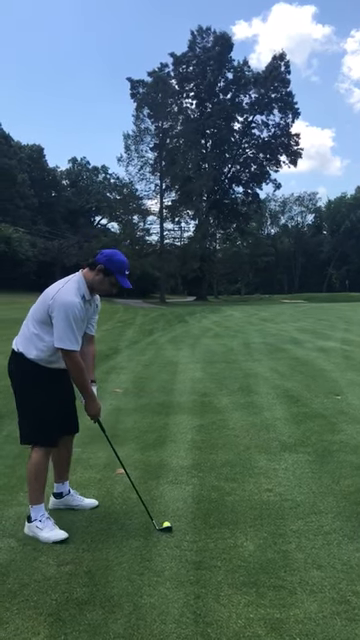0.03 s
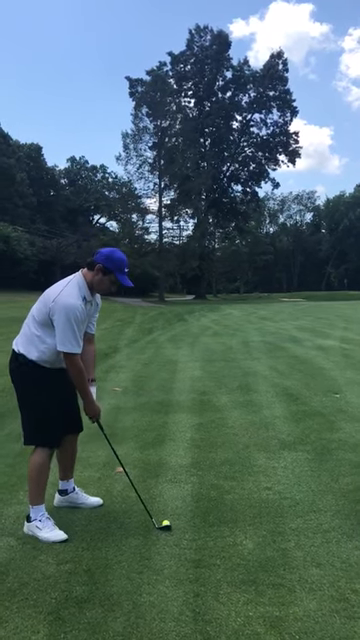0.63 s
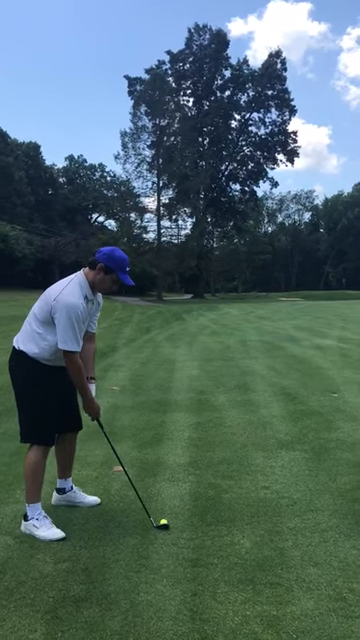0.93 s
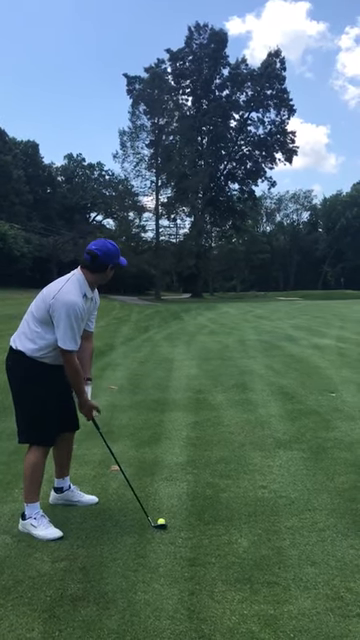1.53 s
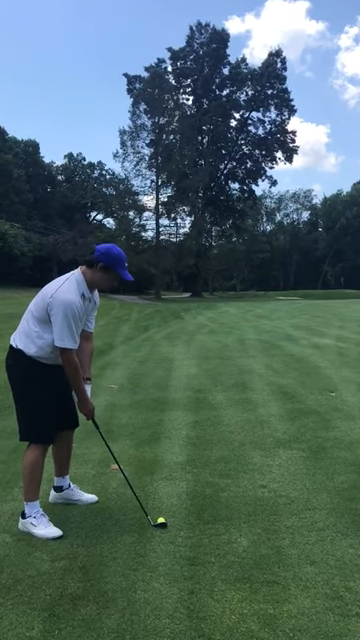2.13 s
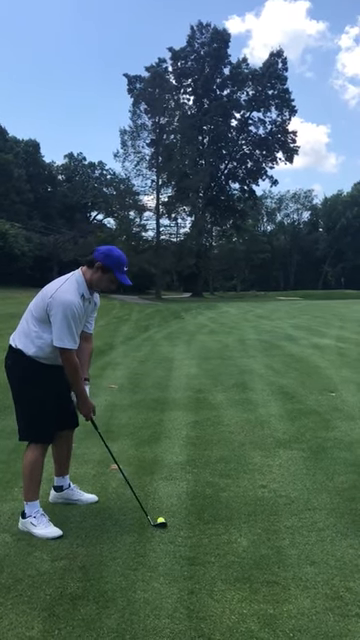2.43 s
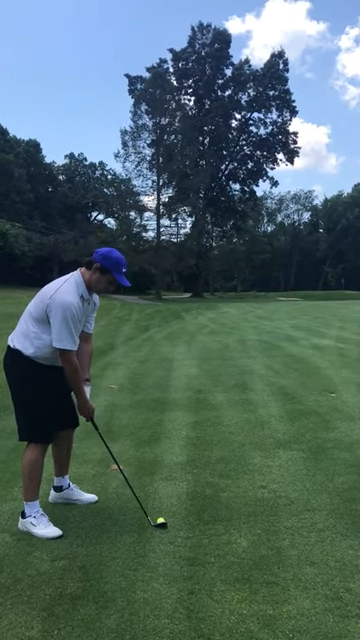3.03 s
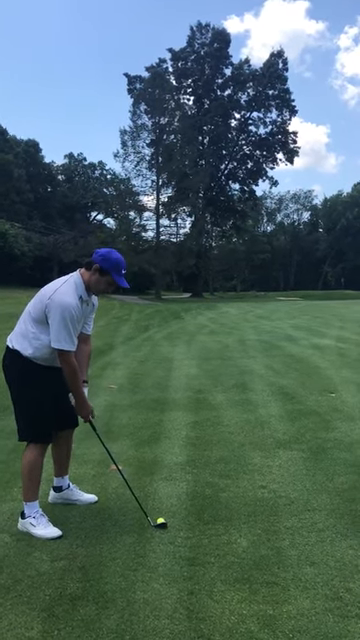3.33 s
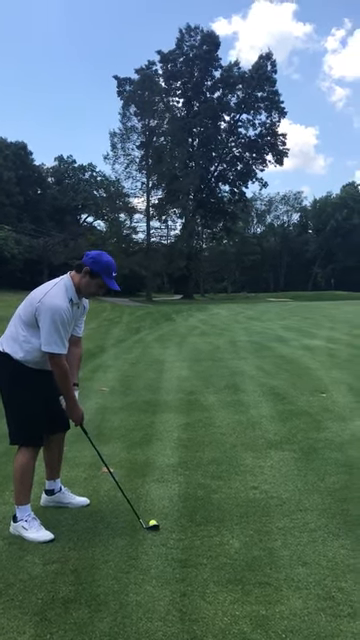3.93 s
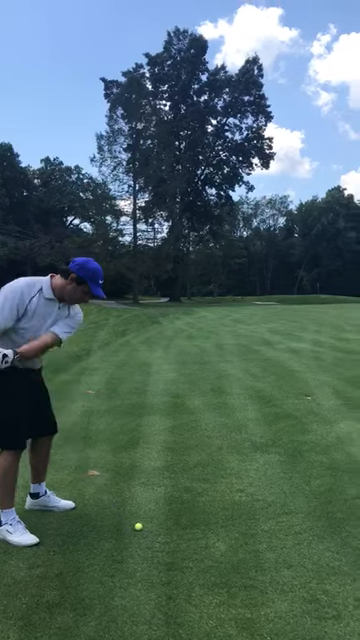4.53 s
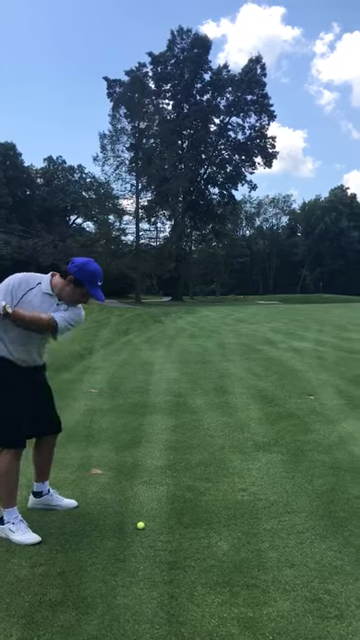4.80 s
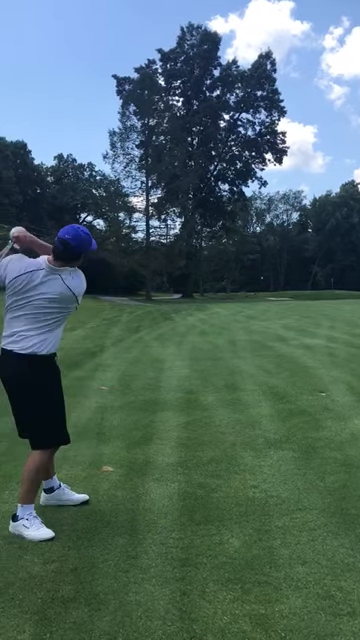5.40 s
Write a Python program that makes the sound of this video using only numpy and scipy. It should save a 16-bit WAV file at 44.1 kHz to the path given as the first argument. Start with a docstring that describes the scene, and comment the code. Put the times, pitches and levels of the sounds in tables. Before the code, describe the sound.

Soft traffic noise and a far engine hum carry across an open golf course, under a faint hiss of leaves, insects and occasional birds. After about five seconds, a nearby golf club gives a quick whoosh and one loud crack against the ball, with a brief scrape of grass. The ball leaves a barely audible fizz and the quiet background continues.

```python
"""Golf shot on a quiet fairway.

Far traffic rumbles behind the trees, an engine drones twice, and leaves, insects and birds sit faintly on top.
Late in the scene the shaft swishes through the air and the club strikes the ball with one dry crack.
The head rings for a few milliseconds, the sole skims the turf, and the spinning ball fizzes away."""
import sys
import numpy as np
from scipy import signal
from scipy.fft import rfft, irfft, next_fast_len
from scipy.io import wavfile
from scipy.ndimage import map_coordinates

SR = 44100
rng = np.random.default_rng(int(sys.argv[2]) if len(sys.argv) > 2 else 0)


def wrap_up_sound(samples):
    """Save the sound to the file named by the first command line argument, as 16-bit audio."""
    columns = np.atleast_2d(samples).T
    # keep every value between -1 and 1, then stretch to whole-number steps
    tamed = np.clip(columns, -1, 1)
    steps = np.round(tamed * 32767).astype(np.int16)
    wavfile.write(sys.argv[1], SR, steps)


N = 245195
TIME = np.arange(N) / SR
IMPACT_S = 5.1927


def from_db(db):
    """Decibels to gain."""
    return 10 ** (np.asarray(db) / 20)


def rms_one(x):
    """Scale to rms 1."""
    return x / np.sqrt(np.mean(x ** 2) + 1e-20)


def butter(x, hz, kind):
    """Second-order Butterworth filter."""
    return signal.sosfilt(signal.butter(2, hz, kind, fs=SR, output="sos"), x + 1e-18)


def noise(spectrum):
    """Noise at rms 1, shaped by (frequency [Hz], level [dB]) points and rolled off beyond them."""
    hz, db = np.transpose(spectrum)
    size = next_fast_len(N)
    log_hz = np.log(np.arange(size // 2 + 1) * SR / size + 1)
    outside = np.abs(log_hz - np.clip(log_hz, np.log(hz[0]), np.log(hz[-1])))
    gain = from_db(np.interp(log_hz, np.log(hz), db) - 30 * outside)
    return rms_one(irfft(rfft(rng.standard_normal(size)) * gain, size)[:N])


def flutter(rate, depth_db):
    """A gain that wanders at random, about rate times a second."""
    knots = rng.standard_normal(400)
    return from_db(depth_db * map_coordinates(knots, [TIME * rate], order=3, mode="mirror"))


def click(s):
    """One unit impulse at time s."""
    return 1.0 * (np.arange(N) == round(s * SR))


def ring(force, hz, t60):
    """A resonator: a unit click sets off a decaying sine of height 1."""
    decay = from_db(-60 / (t60 * SR))
    angle = 2 * np.pi * hz / SR
    return signal.lfilter([0, np.sin(angle)], [1, -2 * decay * np.cos(angle), decay ** 2], force + 1e-18)


def burst(s, rise, t60):
    """An envelope that rises from time s and dies away."""
    age = np.maximum(TIME - s, 0)
    return (1 - np.exp(-age / rise)) * from_db(-60 * age / t60)


def swell(s, width):
    """A bell-shaped envelope around time s."""
    return np.exp(-((TIME - s) / width) ** 2)


# the steady bed of farther traffic: (rumble [dB], growl [dB], tyre roar [dB], tread song [dB], wash [dB])
TRAFFIC_BED = (-52.5, -56.5, -63, -72, -56)
# pass-bys behind the trees, at their nearest: (time [s], time to cover their own distance [s],
# rumble [dB], growl [dB], tyre roar [dB], tread song [dB], wash [dB])
PASS_BYS = [(.42, 0.79, -53, -52.5, -71, -70, -63.5), (2.0, 0.42, -46, -58, -56.5, -56, -75),
            (2.95, 0.48, -46.5, -59, -57, -76, -59), (3.85, 0.43, -49, -56, -48.5, -53, -65),
            (4.7, 0.53, -50.5, -48, -58, -57, -54.5), (5.6, .35, -53, -52.5, -62, -62, -60)]


def traffic_gains():
    """Each vehicle drives a straight line, growing and fading with its distance; their powers add."""
    falloff = 1.48   # spreading plus loss over the grass
    power = from_db(TRAFFIC_BED)[:, None] ** 2
    for s, passing_s, *levels_db in PASS_BYS:
        distance = np.hypot(1, (TIME - s) / passing_s)
        power = power + (from_db(levels_db)[:, None] / distance ** falloff) ** 2
    return np.sqrt(power)


# engine tone, deep rumble and low-mid growl: (frequency [Hz], relative level [dB])
RUMBLE_EQ = [(22, -28), (38, -6.5), (58, 1), (100, -1.5), (140, -2), (170, -10.5), (230, -21)]
GROWL_EQ = [(140, -9), (170, -2), (205, 2.5), (250, -7), (300, -11.5), (360, -21.5), (500, -33)]
# tyre tone, midrange roar and brighter wash: (frequency [Hz], relative level [dB])
ROAR_EQ = [(250, -24), (350, -10.5), (430, -4.5), (510, -7.5), (630, 1.5), (850, 1), (1050, -3.5),
           (1250, -15.5), (2000, -31)]
WASH_EQ = [(300, -14), (500, -8), (750, -9.5), (1000, 0.5), (1400, 0.5), (1800, -5), (2300, -11),
           (3000, -19), (5000, -30.5)]


def road():
    """Engines rumble and growl low; tyres roar and sing around a kilohertz, dulled by distance."""
    rumble_gain, growl_gain, roar_gain, tread_gain, wash_gain = traffic_gains()
    rumble = rumble_gain * noise(RUMBLE_EQ) * flutter(rate=12, depth_db=1.0)
    growl = growl_gain * noise(GROWL_EQ) * flutter(rate=12, depth_db=0.84)
    roar = roar_gain * noise(ROAR_EQ) * flutter(rate=15, depth_db=0.53)
    tread = tread_gain * noise([(780, -10), (880, -3.5), (940, 1.5), (1020, -3.5), (1100, -18)])
    wash = wash_gain * noise(WASH_EQ) * flutter(rate=9, depth_db=0.5)
    # the louder an engine growls, the more of its treble carries
    sizzle = from_db(-18) * growl_gain * noise([(1900, 0.5), (2600, -0.5), (3300, -2), (4800, -11.5)])
    return rumble + growl + roar + tread + wash + sizzle


# an engine swelling under load: (start [s], length [s], level [dB], firing rate [Hz], glide [Hz/s])
DRONE_CUES = [(.98, 0.84, -40, 51.3, -3.0), (4.652, 0.65, -43.5, 51.6, 3)]


def engine_drone():
    """A far exhaust: the firing rate and a weak octave swell, glide and fade, wavering on the air."""
    attack_s, sag_db_per_s, release_db_per_s = .15, 3.5, 45
    out = 0
    for s, length, level_db, hz, glide in DRONE_CUES:
        age = np.maximum(TIME - s, 0)
        fade_db = sag_db_per_s * age + release_db_per_s * np.maximum(age - length, 0)
        envelope = np.minimum(age / attack_s, 1) * from_db(level_db - fade_db)
        phase = 2 * np.pi * np.cumsum(hz + glide * age) / SR
        out = out + envelope * (np.sin(phase) + from_db(-22) * np.sin(2 * phase))
    return np.sqrt(2) * flutter(rate=8, depth_db=1.0) * out


# the airy hiss of leaves: (frequency [Hz], relative level [dB])
LEAF_EQ = [(2000, -3), (3000, -2), (3700, 1.5), (4900, -2), (5600, 1.5), (7200, -1), (8400, -4.5),
           (9400, -10.5), (10400, -17), (11700, -13), (15500, -18.5)]


def breeze():
    """Leaves hiss evenly in the tree line; a thin top-end hiss fades in around the shot."""
    hiss_start_s, hiss_rise_s = 5.18, .05
    leaves = from_db(-62.5) * noise(LEAF_EQ) * flutter(rate=4.96, depth_db=0.4)
    fade_in = 1 - np.exp(-np.maximum(TIME - hiss_start_s, 0) / hiss_rise_s)
    hiss = from_db(-72) * fade_in * noise([(8000, -9), (10400, -2), (11800, 0), (15500, -3)])
    return leaves + hiss


def insects():
    """A thin chorus shimmers and throbs through one long swell."""
    peak_s, period_s, throb_db = 2.01, .91, 5.5
    lull = np.sin(np.pi * (TIME - peak_s) / period_s) ** 2
    envelope = from_db(-66.5 - throb_db * lull) * swell(peak_s, width=2.2)
    return envelope * noise([(5500, -7), (6600, 0), (7300, -1), (8200, -2.5), (9500, -18)])


# faint bird calls: (time [s], pitch [Hz], level [dB])
BIRD_CHIPS = [(2.16, 3950, -64), (2.38, 3800, -62), (4.42, 4570, -62), (4.8, 4500, -67)]


def birds():
    """Distant birds chip, each call a short pure tone with a slight downward bend."""
    out = 0
    for s, hz, db in BIRD_CHIPS:
        pitch = hz * (1 - .03 * np.tanh((TIME - s) / 0.0082))
        out = out + from_db(db) * swell(s, width=0.011) * np.sin(2 * np.pi * np.cumsum(pitch) / SR)
    return out


# tiny dry ticks close by: (time [s], level [dB], centre [Hz])
TICK_CUES = [(.8076, -57, 10200), (2.612, -54, 11500)]


def ticks():
    """Brief bright ticks, barely above the leaves."""
    out = 0
    for s, db, hz in TICK_CUES:
        band = noise([(hz * .75, -6), (hz, 0), (hz * 1.3, -7)])
        out = out + from_db(db) * burst(s, rise=.001, t60=0.02) * band
    return out


def swish():
    """Air whooshes past the shaft, peaking with its speed at the ball."""
    speed = np.exp(-np.abs(TIME - IMPACT_S) / 0.034)
    air = noise([(120, -5), (250, -2), (600, -5), (1500, -11), (4000, -23), (9000, -31)])
    return from_db(-45) * speed * air


def ball_flight():
    """The spinning ball gives a faint whistle that sinks as it slows: a quick fizz, then a soft trail."""
    start_hz, end_hz, slowing_s, loudest_s = 9000, 3400, .062, 5.335
    age = np.maximum(TIME - IMPACT_S, 0)
    pitch = end_hz + (start_hz - end_hz) * np.exp(-age / slowing_s)
    whistle = np.sqrt(2) * np.sin(2 * np.pi * np.cumsum(pitch) / SR)
    envelope = from_db(-60) * swell(loudest_s, width=0.012) + from_db(-74) * (TIME > loudest_s)
    turbulence = rms_one(butter(rng.standard_normal(N), 120, "low"))
    return envelope * turbulence * whistle


# resonances of the sole dragging through turf: (frequency [Hz], relative level [dB], t60 [s])
SCRAPE_MODES = [(302, -20, 0.036), (1250, 0.5, 0.018), (1810, -12, .01), (3800, -4, 0.0075),
                (5700, -12, 0.0099)]
# the bright rip of grass blades: (frequency [Hz], relative level [dB])
TORN_GRASS_EQ = [(2000, 7), (6000, -2), (9000, -3), (12000, -4), (15500, -10)]


def turf():
    """The sole drags through the grass just after the ball: gritty rub, torn blades, a soft soil thud."""
    grit = rng.standard_normal(N) * burst(IMPACT_S + 0.0038, rise=0.0014, t60=0.027)
    rub = from_db(-35) * sum(from_db(db) * ring(grit, hz, t60) for hz, db, t60 in SCRAPE_MODES)
    blades = from_db(-25) * noise(TORN_GRASS_EQ) * burst(IMPACT_S + 0.001, rise=0.00093, t60=0.02)
    thud = from_db(-34) * ring(click(IMPACT_S + 0.0023), hz=180, t60=0.033)
    return rub + blades + thud


# the head hits ball, then turf: (time after impact [s], relative level [dB], low-pass cutoff [Hz])
CLUB_CONTACTS = [(0.0, 1, 16000), (.00215, -15.5, 15000), (.0088, -17.5, 2400)]
# the ring of club head and ball: (frequency [Hz], relative level [dB], t60 [s])
HEAD_MODES = [(403, -21, 0.021), (828, -13.5, 0.019), (1305, -11.5, 0.024), (1687, -11.5, 0.021),
              (1920, -6.5, 0.009), (2470, -12, 0.0067), (3535, -16, 0.018), (4435, -28.5, 0.028),
              (5330, -17.5, 0.013), (5800, -20, 0.012), (6180, -23.5, 0.011), (8530, -25.5, 0.006),
              (10581, -21, 0.0016)]
# the crack's tail, scattered back by ground and golfer: (frequency [Hz], relative level [dB])
SCATTER_EQ = [(120, 11), (400, 2), (700, -2), (1100, -1), (1900, -1), (2800, -20), (3900, -16), (4800, -33),
              (5500, -13), (7500, -39), (15000, -35)]


def strike():
    """Each contact rings the club head; a bright snap gives the attack, scattered sound a short tail."""
    force = sum(from_db(db) * butter(click(IMPACT_S + lag), hz, "low") for lag, db, hz in CLUB_CONTACTS)
    # neighbouring modes swing in opposite senses, so the crack takes a moment to peak
    head = sum((-1) ** k * from_db(db) * ring(force, hz, t60)
               for k, (hz, db, t60) in enumerate(HEAD_MODES))
    snap = from_db(-19) * butter(click(IMPACT_S), 11000, "high")
    scatter = from_db(-23) * noise(SCATTER_EQ) * burst(IMPACT_S + 0.0028, rise=0.0032, t60=0.068)
    return head + snap + scatter


def scene():
    """The shot over the open-air ambience, in mono."""
    shot = swish() + strike() + turf() + ball_flight()
    ambience = road() + engine_drone() + breeze() + insects() + birds() + ticks()
    return (ambience + shot)[None]


def record(dry):
    """Gain control ducks a little after a loud peak and recovers; a steep low-pass trims the top."""
    threshold_db, slope, attack_s, recovery_db_per_s = -18, .15, 0.038, 11
    over_db = np.maximum(20 * np.log10(np.abs(dry) + 1e-9) - threshold_db, 0)
    recovery_db = recovery_db_per_s * TIME
    held_db = np.maximum.accumulate(slope * over_db + recovery_db, axis=-1) - recovery_db
    pole = np.exp(-1 / (attack_s * SR))
    duck_db = signal.lfilter([1 - pole], [1, -pole], held_db)
    high_cut = signal.ellip(10, .1, 80, 15900, fs=SR, output="sos")
    return signal.sosfilt(high_cut, dry * from_db(-duck_db))


dry = scene()
out = record(dry)
wrap_up_sound(out)
```